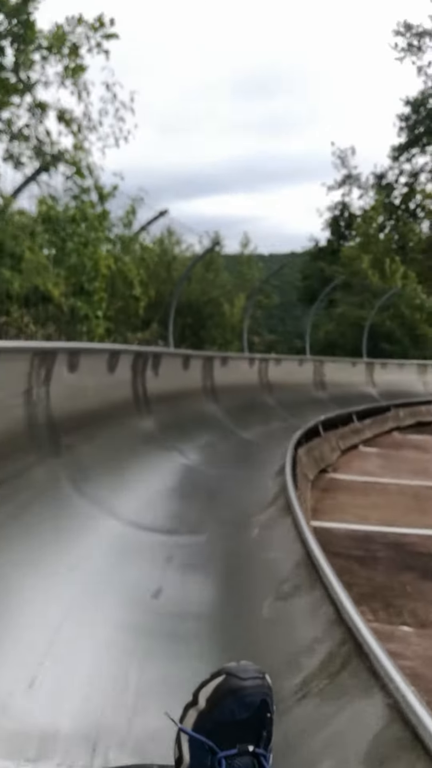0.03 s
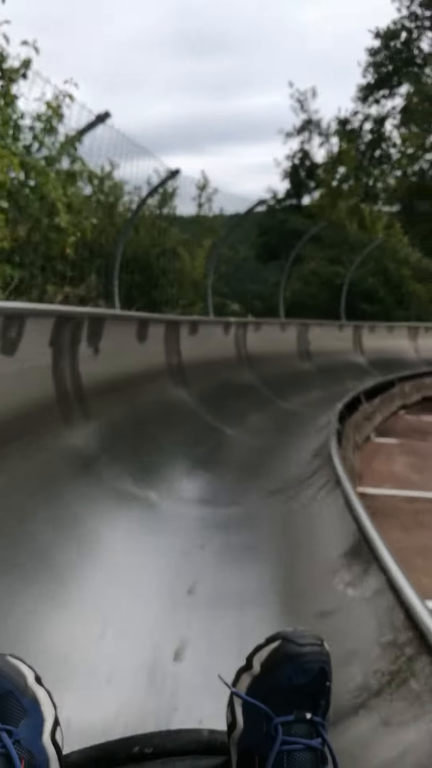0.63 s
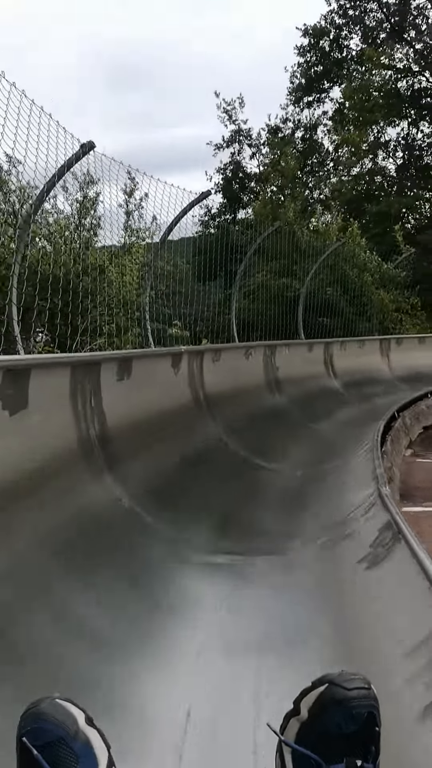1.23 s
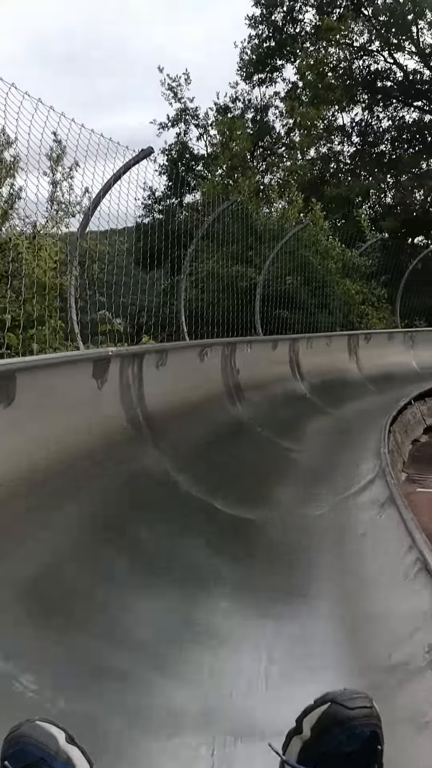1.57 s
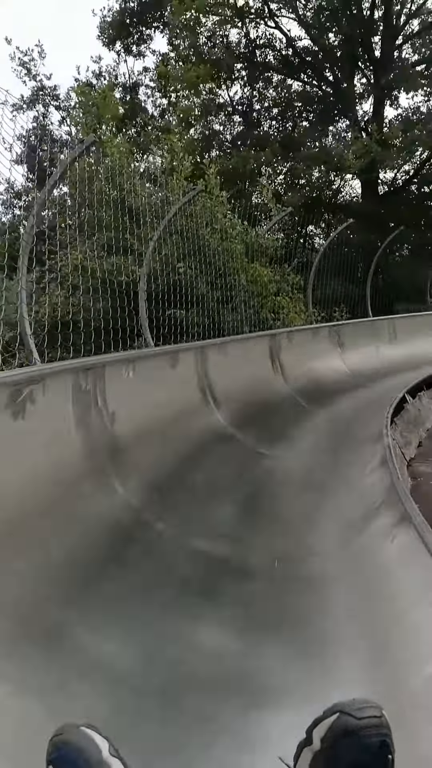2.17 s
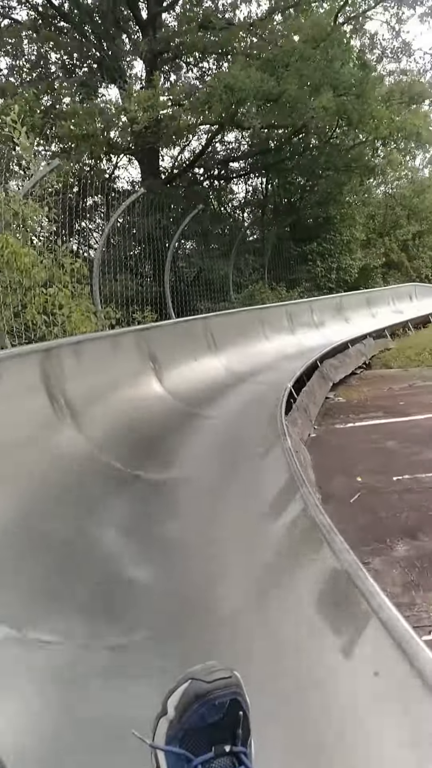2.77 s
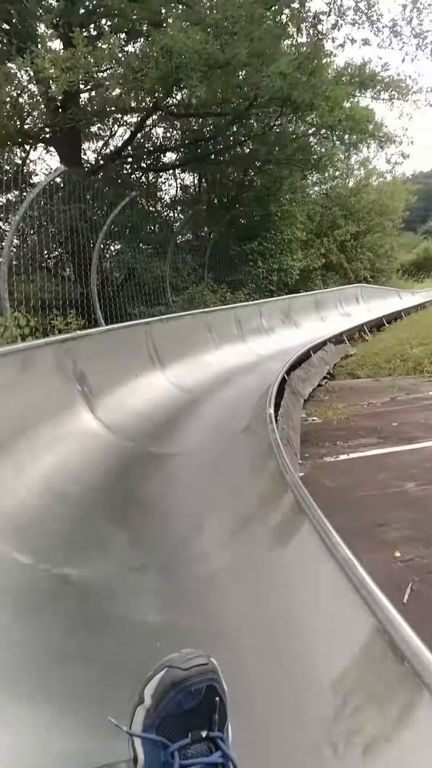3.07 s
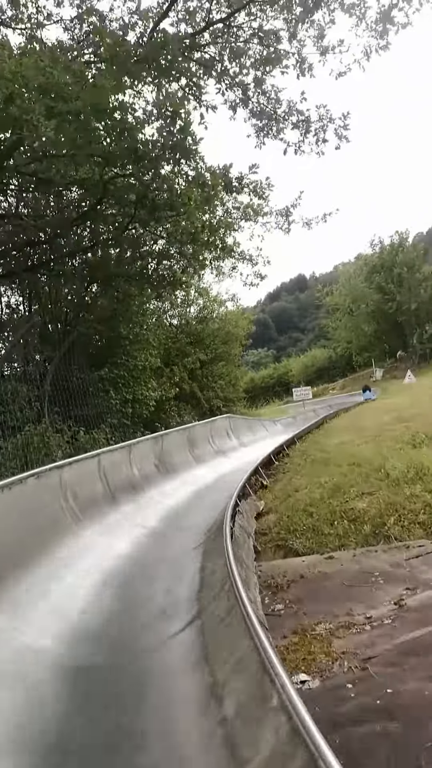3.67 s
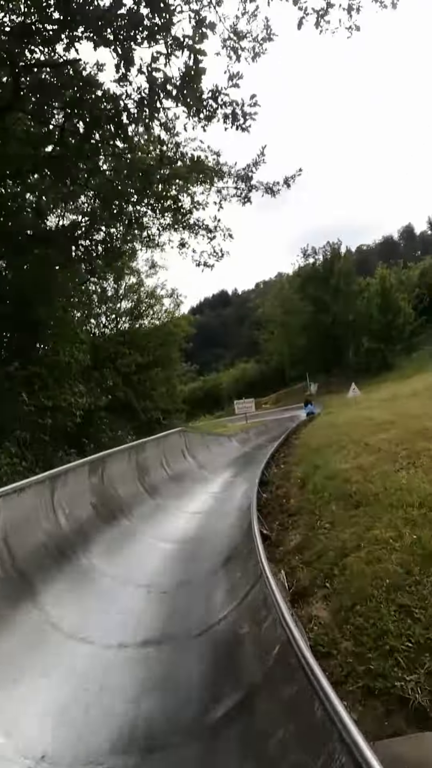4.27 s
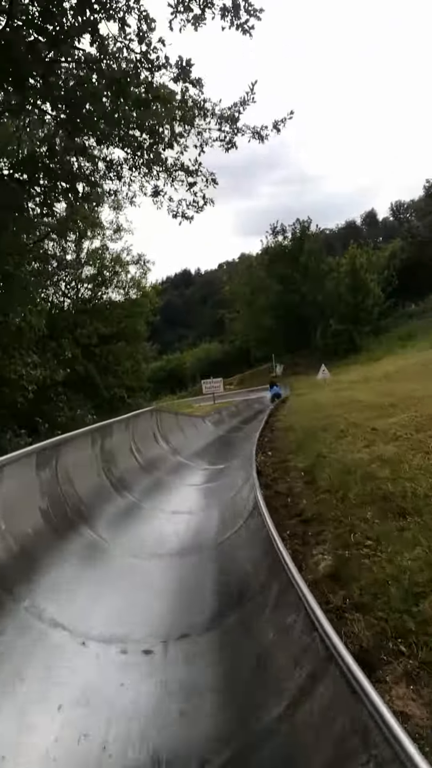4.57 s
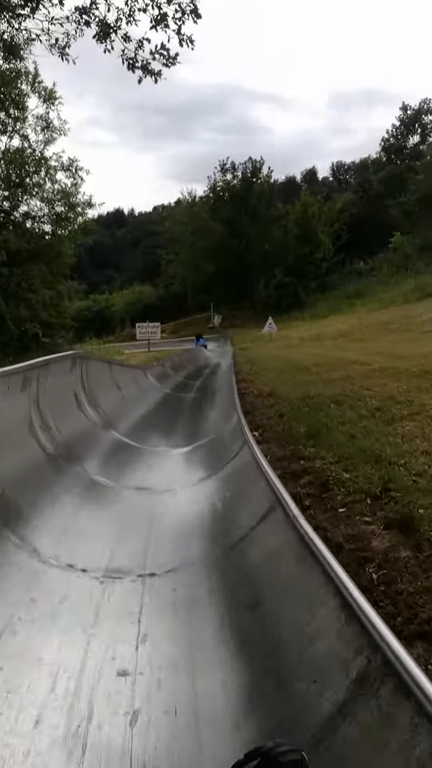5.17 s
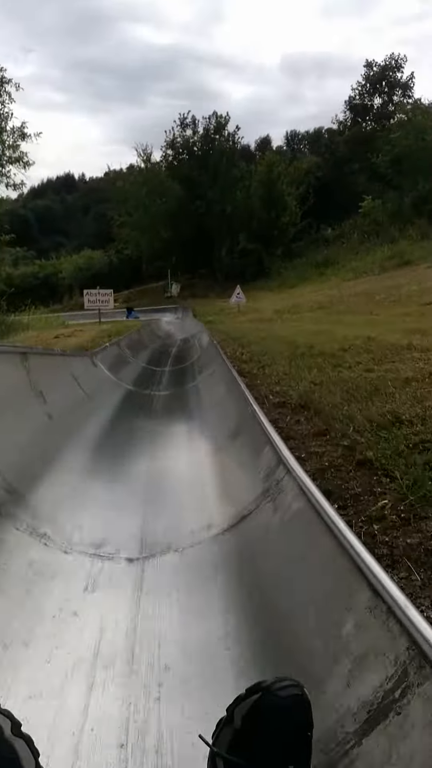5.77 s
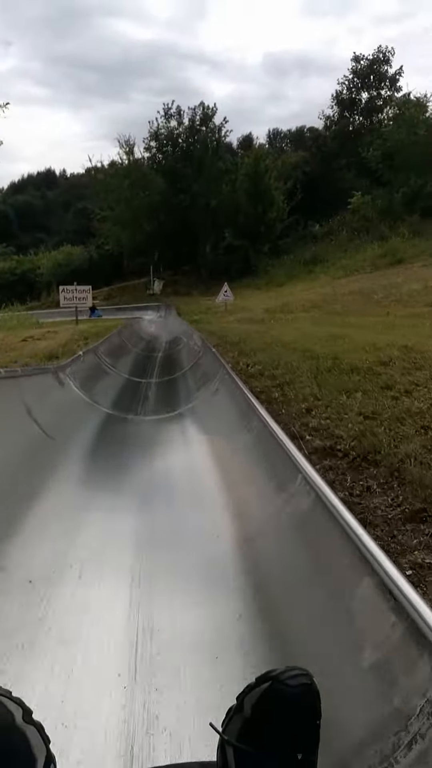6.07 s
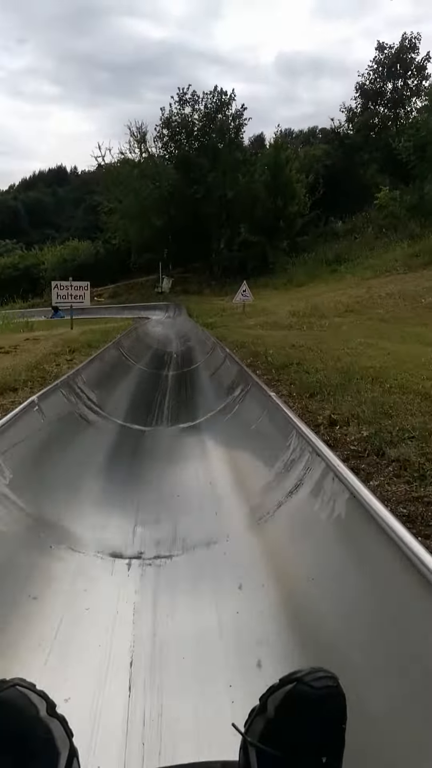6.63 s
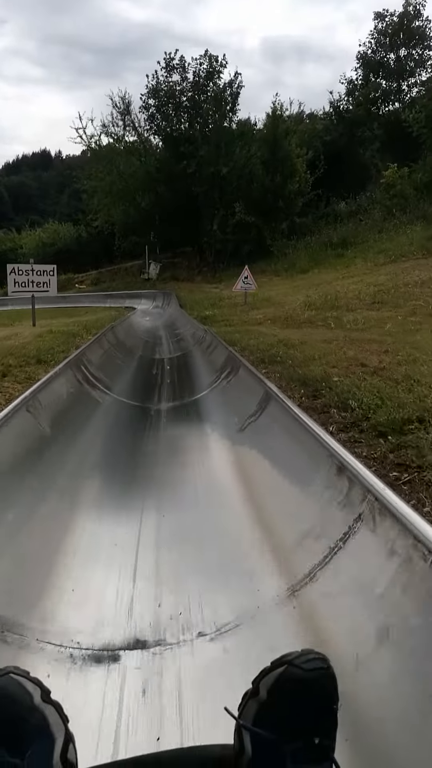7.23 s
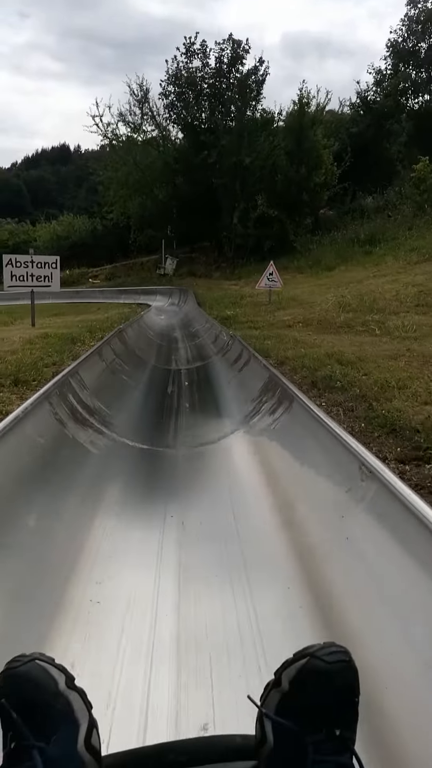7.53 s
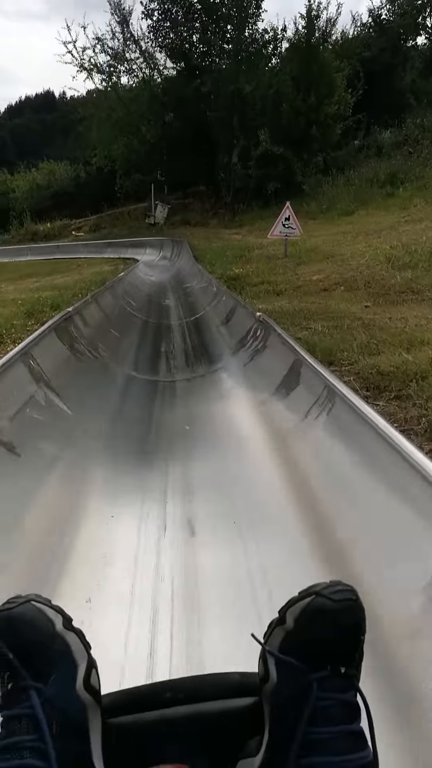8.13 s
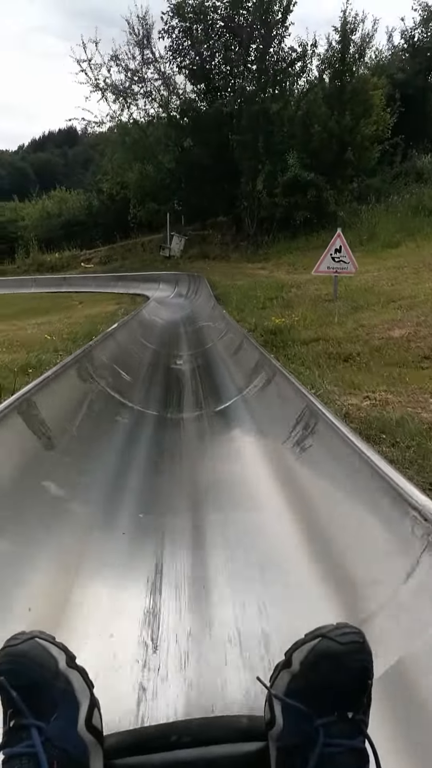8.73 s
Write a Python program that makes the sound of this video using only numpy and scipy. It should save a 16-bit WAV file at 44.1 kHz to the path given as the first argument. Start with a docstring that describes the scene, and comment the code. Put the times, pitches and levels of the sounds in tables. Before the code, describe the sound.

Heard close up from the rider's seat, a sled starts with a faint roll along a metal trough in the open air. The wheel rumble swells, dotted with hollow thumps at the joints and tinny clacks. A friction hiss with thin, hoarse squeals joins in, while wind rumbles on the microphone. The ride gets louder, with brief wheel chatter and a harsh scrape, before one very loud bang over a joint.

```python
"""A steel trough, ridden on a wheeled sled that gathers speed; stereo microphone at the rider's seat.
Close by, the wheels rumble on uneven steel and the runners hiss and squeal with friction. Every seam
thumps the plastic shell, loose fittings clack and jingle, and slipping wheels chatter. The sled scrapes
the steel in brief strokes, hardest late on, then slams over one bad seam. Wind buffets the microphone."""
import sys
import numpy as np
from scipy import signal
from scipy.fft import rfft, irfft
from scipy.io import wavfile
from scipy.ndimage import uniform_filter1d, map_coordinates

SR = 44100
rng = np.random.default_rng(int(sys.argv[2]) if len(sys.argv) > 2 else 0)


def waveform_to_disk(signal):
    """Save audio, clipped to [-1, 1], as 16-bit WAV at the path in sys.argv[1]."""
    frames = np.transpose(np.atleast_2d(signal))
    scaled = np.clip(frames, -1, 1) * 32767
    samples = np.round(scaled).astype(np.int16)
    wavfile.write(sys.argv[1], SR, samples)


N = 396900
TIME = np.arange(N) / SR
AGE = TIME[:SR // 2]   # seconds since a blow

# The wheels drop over seams. Each row: start in seconds, relative level in dB, top of the push in Hz.
SEAM_THUMPS = [(0.23, -38.5, 282), (0.795, -35, 238), (1.729, -27, 282), (2.219, -24, 300),
               (2.647, -24, 297), (3.019, -26, 343), (3.421, -24, 1470), (3.786, -18, 407),
               (4.171, -24, 1190), (4.21, -27.5, 280), (4.983, -25, 515), (5.285, -25.5, 616),
               (5.53, -34, 153), (6.092, -24, 283), (6.123, -24, 1550), (6.956, -16.5, 940),
               (7.396, -17, 277), (7.627, -19, 307), (8.104, -17, 350), (8.799, -18, 330),
               (8.822, -3, 1170)]
# Loose fittings knock. Each row: start in seconds, relative knock level in dB, tick level in dB,
# ring of the struck spot in Hz.
FITTING_CLACKS = [(0.586, -43, -54, 1140), (0.778, -54, -53.5, 1620), (1.128, -34.5, -53.5, 860),
                  (1.162, -40, -51.5, 1740), (2.055, -32.5, -48, 1370), (2.465, -36.5, -41.5, 1730),
                  (2.55, -55, -49.5, 2470), (2.601, -39.5, -47, 1310), (2.904, -44, -39.5, 1730),
                  (2.927, -37, -38.5, 1740), (2.953, -40, -40.5, 940), (3.055, -35, -40, 1900),
                  (3.293, -36.5, -39, 910), (3.326, -38, -37, 1700), (3.401, -34.5, -38.5, 1750),
                  (4.432, -29, -30.5, 1120), (4.485, -34, -36.5, 2840), (4.643, -25.5, -37, 920),
                  (5.249, -33, -42, 2930), (5.289, -31, -38.5, 1920), (6.123, -28, -30, 1230),
                  (6.365, -29.5, -40, 1950), (6.957, -21, -29, 1720), (7.295, -22, -40, 1320),
                  (8.056, -19, -33, 910), (8.813, -24.5, -26.5, 805), (8.829, -10, -15.5, 700)]
# Tinny modes of the fittings. Each row: frequency in Hz, gain in dB, seconds to fall by 60 dB.
FITTING_MODES = [(1700, -3, .06), (2600, -5, .05), (3190, -2, .025), (3500, 0, .025), (4300, -3, .022),
                 (5030, -7, .018)]
# Resonances of the wheels and of the trough. Each row: frequency in Hz, width in Hz, gain in dB.
WHEEL_RESONANCES = [(1265, 140, -2.5), (1425, 130, 0), (1900, 160, -13), (2450, 190, -2)]
TROUGH_RESONANCES = [(770, 154, 4.5), (963, 152, 5.5), (1172, 114, 3), (1400, 208, 0), (1640, 310, -3.5),
                     (2403, 120, -3.5), (3610, 320, -13.5)]


def from_db(db):
    """Decibels to gain."""
    return 10 ** (np.asarray(db) / 20)


def rms_one(x):
    """Scale to an rms of one."""
    return x / np.sqrt(np.mean(x ** 2) + 1e-20)


def peak_one(x):
    """Scale so that the loudest few milliseconds have an rms of one."""
    return x / np.sqrt(uniform_filter1d(x ** 2, size=256).max() + 1e-20)


def in_time(points):
    """Join (seconds, value) points by straight lines."""
    return np.interp(TIME, *np.transpose(points))


def on_bins(points, x):
    """Read (Hz, value) points over log frequency at the Fourier bins of x."""
    hz, value = np.transpose(points)
    bin_hz = np.fft.rfftfreq(x.shape[-1], 1 / SR)
    return np.interp(np.log(bin_hz + 1), np.log(hz), value)


def coloured(x, colour):
    """Give x a broad spectrum; rms one."""
    return rms_one(irfft(rfft(x) * from_db(on_bins(colour, x)), len(x)))


def add(track, s, sound):
    """Mix a sound into the track at s seconds."""
    start = int(s * SR)
    track[start:start + len(sound)] += sound[:N - start]


def drift(rate_hz):
    """A random wander, mostly slower than rate_hz, with a spread of one."""
    step = 40   # samples between points
    pole = np.exp(-2 * np.pi * rate_hz * step / SR)
    slow = signal.lfilter([1], [1, -2 * pole, pole * pole], rng.standard_normal(N // step + 2002))[2000:]
    return np.interp(np.arange(N) / step, np.arange(len(slow)), rms_one(slow))


def grit(per_s, spread_db, count=N):
    """Tiny contacts of uneven size at random moments; rms one."""
    sizes = from_db(spread_db * np.minimum(rng.exponential(1, count), 4))
    signs = rng.choice([-1, 1], count)
    return rms_one(sizes * signs * (rng.random(count) < per_s / SR))


def resonate(x, peaks):
    """Pass x through parallel resonances of (Hz, width in Hz, dB); rms one."""
    out = 0
    for k, (hz, width, db) in enumerate(peaks):
        r = np.exp(-np.pi * width / SR)
        gain = (-1) ** k * from_db(db) * (1 - r * r) / 2
        out += signal.lfilter([gain, 0, -gain], [1, -2 * r * np.cos(2 * np.pi * hz / SR), r * r], x)
    return rms_one(out)


def strike(force, modes, spread_db, flex=0.03):
    """A force rings the modes, unevenly from blow to blow; the part flexes, which shifts their pitch."""
    hz, db, t60 = np.transpose(modes)[:, :, None]
    hz = hz * (1 + flex * rng.uniform(-0.83, 1, hz.shape))
    decays = from_db(db + spread_db * rng.standard_normal(db.shape) - 60 * AGE / t60)
    ring = (decays * np.sin(2 * np.pi * hz * AGE)).sum(0)
    return peak_one(signal.fftconvolve(force, ring)[:len(AGE)])


def stroke(s, length_s, db, attack_s, release_s, slope_db_per_s):
    """Gain of a contact that bites, slopes in level while held, and lets go."""
    age = np.maximum(TIME - s, 0)
    held = from_db(db + slope_db_per_s * np.minimum(age, length_s))
    release = np.exp(-np.clip((age - length_s) / release_s, 0, 20))
    return held * np.minimum(age / attack_s, 1) * release


def softened(x, s):
    """Dull a contact made at s seconds; with speed, contacts get harder and reach higher."""
    # Each row: time in seconds, treble corner in Hz.
    contact_top = [(2.1, 1580), (3.1, 10600), (8.0, 17000)]
    corner_hz = np.interp(s, *np.transpose(contact_top))
    return signal.sosfilt(signal.butter(1, corner_hz, fs=SR, output="sos"), x)


def wind():
    """Head wind buffets the microphone with a low rumble."""
    # Strength of the wind. Each row: time in seconds, level in dB.
    head_wind = [(0.0, -74), (1.24, -56.5), (5.96, -48), (6.81, -41), (8.21, -36), (8.36, -46.5),
                 (8.7, -38.5)]
    # Its spectrum. Each row: frequency in Hz, gain in dB.
    wind_colour = [(15, -53), (30, 0), (60, 7), (90, 8), (160, 0), (500, -87)]
    return from_db(in_time(head_wind) + drift(6.2)) * coloured(rng.standard_normal(N), wind_colour)


def jingle():
    """Light touches ring a tiny loose metal part at one high resonance."""
    # Spells of shaking. Each row: start in seconds, length in seconds, level in dB.
    spells = [(2.92, 0.14, -69), (3.29, 0.22, -65), (3.85, 0.5, -72)]
    shaking = sum(from_db(db) * ((TIME > s) & (TIME < s + length_s)) for s, length_s, db in spells)
    return shaking * resonate(grit(70, 3.5), [(9580, 110, 0)])


def squeals(flutter_db=4.5):
    """Friction makes the runners squeal hoarsely: a narrow, fluttering band that slides down."""
    # Each row: start and length in seconds, first and last pitch in Hz, half width in Hz, level in dB.
    slides = [(0.121, 0.15, 516, 434, 20, -56), (2.013, 0.035, 6500, 4900, 700, -59),
              (4.45, 0.85, 6480, 6200, 260, -65), (4.85, 1.35, 5650, 5560, 130, -60),
              (6.0, 1.6, 6250, 5550, 270, -60)]
    out = np.zeros(N)
    for s, length_s, start_hz, end_hz, half_width_hz, db in slides:
        age = TIME[:int(length_s * SR)]
        phase = 2 * np.pi * np.cumsum(np.interp(age, [0, length_s], [start_hz, end_hz])) / SR
        narrow = signal.butter(2, half_width_hz, fs=SR, output="sos")
        cos_gain, sin_gain = signal.sosfilt(narrow, rng.standard_normal((2, 2 * SR)))[:, -len(age):]
        band = rms_one(cos_gain * np.cos(phase) + sin_gain * np.sin(phase))
        swell = np.sqrt(np.sin(np.pi * age / length_s))
        add(out, s, from_db(db) * swell * band)
    return out * from_db(flutter_db * drift(31))


def rattle():
    """Small loose parts rattle in short flurries once the sled is under way."""
    flurries = signal.lfilter([1], [1, -np.exp(-1 / (0.005 * SR))], np.abs(grit(22, 2.0)))
    resonances = [(hz, np.log(1000) / (np.pi * t60), db) for hz, db, t60 in FITTING_MODES]
    under_way = np.interp(TIME, [1.1, 1.7], [0, 1])
    return under_way * resonate(flurries * rng.standard_normal(N), resonances)


def runners(touch_s=3.5, clear_db=-82, touching_db=-58.5):
    """The runners hiss faintly while riding clear, then sing and hiss louder on touching the steel."""
    # Their resonances. Each row: frequency in Hz, width in Hz, gain in dB.
    runner_resonances = [(4500, 380, -10), (4930, 115, 0)]
    # They press harder. Each row: start in seconds, length in seconds, hiss level in dB.
    drags = [(3.27, 1.4, -51.5), (5.292, 0.59, -48.5), (6.095, 2.9, -44)]
    # Spectrum of the hiss. Each row: frequency in Hz, gain in dB.
    hiss_colour = [(1500, 13), (3200, 6.5), (5500, 6), (8000, -4.5), (12000, -11.5), (15500, -21.5)]
    touching = np.clip((TIME - touch_s) / 0.013, 0, 1)
    singing_db = np.interp(TIME - touch_s, [0, 2.2], [-56.5, -56]) + 2 * drift(12)
    singing = touching * from_db(singing_db) * resonate(rng.standard_normal(N), runner_resonances)
    dragging = sum(stroke(*row, attack_s=0.053, release_s=0.18, slope_db_per_s=0.5) for row in drags)
    hiss_gain = from_db(clear_db) + touching * from_db(touching_db) + dragging
    return singing + hiss_gain * coloured(grit(14000, 3.5), hiss_colour)


def shell_rumble():
    """The plastic shell rumbles and hums under steady rolling."""
    # Spectrum of the rumble. Each row: frequency in Hz, gain in dB.
    rumble_colour = [(40, -9), (70, -9.5), (120, 2), (480, -6.5), (620, -14.5), (1000, -26), (2000, -73)]
    # Resonances of the shell. Each row: frequency in Hz, width in Hz, gain in dB.
    shell_hum = [(107.4, 51, -8.5), (213.6, 27, 1.5), (270.4, 51, -2.5), (424, 47, -0.5)]
    rumble = coloured(rng.standard_normal(N), rumble_colour)
    return rumble + from_db(-2) * resonate(rng.standard_normal(N), shell_hum)


def wavering(x, pitch_share, rate_hz):
    """The pitch of a ringing wanders as the contact point moves."""
    position = np.cumsum(pitch_share * drift(rate_hz)) + np.arange(N)
    return map_coordinates(x, [position], order=3, mode="wrap")


def panels(x, t60, ring_db):
    """Countless close modes of the steel panels give the noise a fine metallic grain."""
    ring = rng.standard_normal(len(AGE)) * from_db(-60 * AGE / t60)
    return rms_one(x + from_db(ring_db) * rms_one(signal.fftconvolve(x, ring)[:N]))


def wheels():
    """Tiny contacts ring wheels and trough; with speed the grains merge and the wheels ring more."""
    # Spectrum of the rolling noise. Each row: frequency in Hz, gain in dB.
    roll_colour = [(300, -26), (520, -3), (700, 0), (1100, -6.5), (1500, -3), (2300, -1), (3300, -10),
                   (4500, -22), (9000, -99)]
    pace = np.interp(TIME, [2.5, 6.4], [0, 1])
    grains_per_s = 2500 + 6500 * pace
    jolts = resonate(grit(grains_per_s, 10.4), [(1350, 610, 0)])
    wheel_ring = wavering(resonate(jolts, WHEEL_RESONANCES), pitch_share=0.025, rate_hz=8)
    roar = coloured(grit(grains_per_s, 2.9), roll_colour)
    trough_ring = from_db(6 - 9.1 * pace) * resonate(grit(grains_per_s, 2.4), TROUGH_RESONANCES)
    wheel_ring *= from_db(-6.5 + 7 * pace + 0.5 * drift(16))
    return panels(roar + trough_ring + wheel_ring, t60=0.04, ring_db=-8)


def rolling(cruise_db=-50):
    """The uneven steel shakes shell, wheels and runners together."""
    # How hard the sled rolls, rising with speed and in the bend. Each row: time in seconds, effort in dB.
    effort = [(0.0, -77.5), (1.05, -73), (1.42, -60), (1.62, -52.5), (2.1, -50.5), (2.83, -56), (3.41, -52),
              (4.36, -51.5), (5.11, -48.5), (6.02, -52.5), (6.94, -39), (7.62, -37), (7.72, -38.5),
              (8.15, -38), (8.72, -41), (9.0, -36)]
    above_cruise_db = in_time(effort) - cruise_db
    rumble = shell_rumble()
    roll = wheels() + from_db(-18) * rattle()
    hiss = runners()
    bumps = drift(14)
    rumble_db = -45 + 0.73 * above_cruise_db + 3.2 * bumps
    roll_db = -48.5 + 0.69 * above_cruise_db + 2.25 * bumps + drift(60)
    return rumble * from_db(rumble_db) + roll * from_db(roll_db) + hiss * from_db(2 * bumps)


def chatter():
    """A wheel slips in quick uneven jerks that ring it roughly, then settles."""
    # Each row: start in seconds, relative level in dB, length in seconds.
    slips = [(5.868, -40, 0.034), (6.732, -33, 0.064), (7.009, -21.5, 0.052), (7.331, -30.5, 0.039),
             (8.139, -31, 0.049), (8.386, -27.5, 0.061), (8.651, -30.5, 0.06)]
    jerk_band = [(1330, 600, 0)]
    jerks = resonate(resonate(grit(900, 1.0), jerk_band), jerk_band)
    ringing = rms_one(from_db(-4) * jerks + resonate(jerks, WHEEL_RESONANCES))
    return ringing * sum(stroke(s, length_s, db - 2.5, attack_s=0.0037, release_s=0.047, slope_db_per_s=-16)
                         for s, db, length_s in slips)


def scrape(grind_fade_s=0.11, roughness_db=1.8):
    """Rough friction grinds the steel as it bites, then thins to a hiss with a high ring."""
    # Each row: start in seconds, length in seconds, relative level in dB.
    scrapes = [(1.56, 0.3, -60.5), (2.018, 0.055, -41.5), (2.077, 0.17, -46.5), (6.981, 0.072, -39.5),
               (7.263, 0.04, -35), (7.62, 0.29, -27.5), (8.358, 0.042, -39)]
    # Spectrum of the friction. Each row: frequency in Hz, gain in dB.
    friction_colour = [(300, -8), (900, 9), (2200, 6.5), (3600, 3.5), (5600, 6), (7000, -0.5), (10000, -5),
                       (15500, -15)]
    # Its high ring. One row: frequency in Hz, width in Hz, gain in dB.
    high_ring = [(5450, 140, 0)]
    friction = coloured(grit(12000, 1.5), friction_colour)
    friction += from_db(-9) * resonate(rng.standard_normal(N), high_ring)
    grind = from_db(-1.5) * resonate(grit(900, 2.2), TROUGH_RESONANCES)
    out = np.zeros(N)
    for s, length_s, db in scrapes:
        bite = np.exp(-np.clip((TIME - s) / grind_fade_s, 0, 20))
        contact = stroke(s, length_s, db, attack_s=0.029, release_s=0.015, slope_db_per_s=-16)
        out += contact * softened(friction + bite * grind, s)
    return out * from_db(roughness_db * drift(56))


def clatter():
    """Contact strength of one clack: a short hard bite, then uneven dying bounces."""
    moments = AGE[::180]
    bounces = np.interp(AGE, moments, rng.exponential(1, len(moments)))
    onset = 1 - np.exp(-AGE / 0.0022)
    return onset * (np.exp(-AGE / 0.005) + 0.15 * bounces * np.exp(-AGE / 0.028))


def fittings(shake_above_db=-24, choke_db=-33, spot_width_hz=95, spot_db=8):
    """Loose fittings clack, on hard seams too: a hollow knock on steel, a bright tick, a tinny ring."""
    # Spectrum of the tick. Each row: frequency in Hz, gain in dB.
    tick_colour = [(1200, 9.5), (3500, 14.5), (5300, 5.5), (9700, -3.5), (15500, -15)]
    clacks = [(s, knock_db, tick_db, [(hz, spot_width_hz, spot_db)])
              for s, knock_db, tick_db, hz in FITTING_CLACKS]
    shakes = [(s, db - 8, db - 22, []) for s, db, _ in SEAM_THUMPS if db > shake_above_db]
    out = np.zeros(N)
    for s, knock_db, tick_db, spot in clacks + shakes:
        cluster = clatter()
        knock = resonate(softened(cluster * grit(7000, 3.4, len(AGE)), s), list(TROUGH_RESONANCES) + spot)
        tick = softened(cluster * coloured(grit(7000, 2.0, len(AGE)), tick_colour), s)
        ring = strike(softened(cluster * grit(7000, 3.1, len(AGE)), s), FITTING_MODES, spread_db=5.5)
        ring *= from_db(min(0, choke_db - tick_db))   # hard blows jam the fitting and choke its ring
        add(out, s, from_db(knock_db - 4) * peak_one(knock))
        add(out, s, from_db(tick_db) * peak_one(peak_one(tick) + ring))
    return out


def shell_thumps(clack_top_hz=1130):
    """Each seam and clack pushes the shell, then judders away; a soft push favours the low modes."""
    # Modes of the plastic shell. Each row: frequency in Hz, gain in dB, seconds to fall by 60 dB.
    shell_modes = [(205, -1, 0.09), (248, -5, 0.07), (335, -3, 0.047), (435, -0.5, 0.055), (520, -9, 0.03)]
    clack_pushes = [(s, knock_db - 4, clack_top_hz) for s, knock_db, _, _ in FITTING_CLACKS]
    out = np.zeros(N)
    for s, db, top_hz in list(SEAM_THUMPS) + clack_pushes:
        force = 0.06 * grit(2500, 2.5, len(AGE)) * np.exp(-AGE / 0.028)   # the judder
        force[0] += 1   # the push
        contact = signal.butter(2, [top_hz / 4, top_hz], "band", fs=SR, output="sos")
        add(out, s, from_db(db - 1.5) * strike(signal.sosfilt(contact, force), shell_modes, spread_db=4))
    return out


def sled():
    """Everything that the ride sets vibrating."""
    return rolling() + shell_thumps() + fittings() + chatter() + jingle() + scrape() + squeals()


def microphone(common, scattered, left_lag_s=0.0006386):
    """Both sides share the lows, the left one later; the highs come from all over the sled and differ."""
    # Each row: frequency in Hz, likeness of left and right from 0 to 1.
    likeness = [(550, .97), (900, .65), (1350, .75), (1700, .4), (10000, .25)]
    # Each row: frequency in Hz, left minus right in dB.
    balance = [(250, 0), (550, -6), (880, -8), (1250, -2.5), (2000, -4), (3500, -3), (9000, 7), (14000, 3)]
    common, scattered = np.pad([common, scattered], ((0, 0), (0, len(AGE))))
    alike = on_bins(likeness, common)
    left_right = np.array([[1], [-1]])
    mid = np.sqrt((1 + alike) / 2) * rfft(common)
    side = np.sqrt((1 - alike) / 2) * rfft(scattered)
    pair = mid + left_right * side
    pair[0] *= np.exp(-2j * np.pi * np.fft.rfftfreq(len(common), 1 / SR) * left_lag_s)
    gains = from_db(on_bins(balance, common) * left_right / 2)
    gains /= np.sqrt(np.mean(gains ** 2, axis=0))
    return irfft(pair * gains, len(common))[:, :N]


def scene():
    """The sled close around the microphone, and the wind alike on both sides."""
    return microphone(sled(), sled()) + wind()


def record(dry, cutoff_hz=15700):
    """The loudest blow overloads the recorder; the top treble is cut."""
    lowpass = signal.ellip(10, 0.1, 80, cutoff_hz, fs=SR, output="sos")
    return signal.sosfilt(lowpass, np.clip(dry, -1, 1))


dry = scene()
out = record(dry)
waveform_to_disk(out)
```